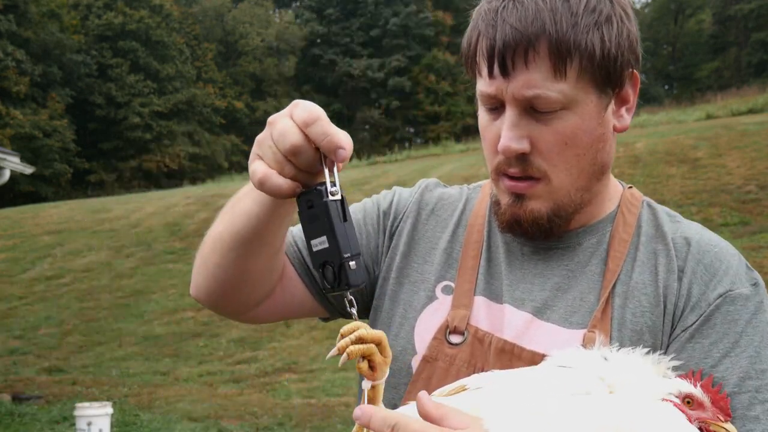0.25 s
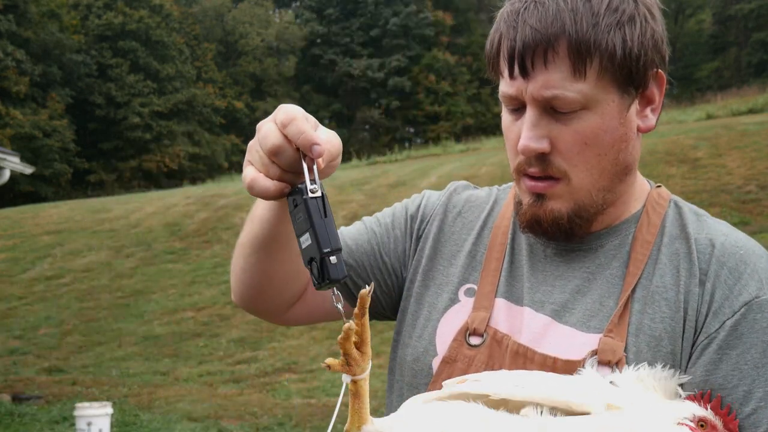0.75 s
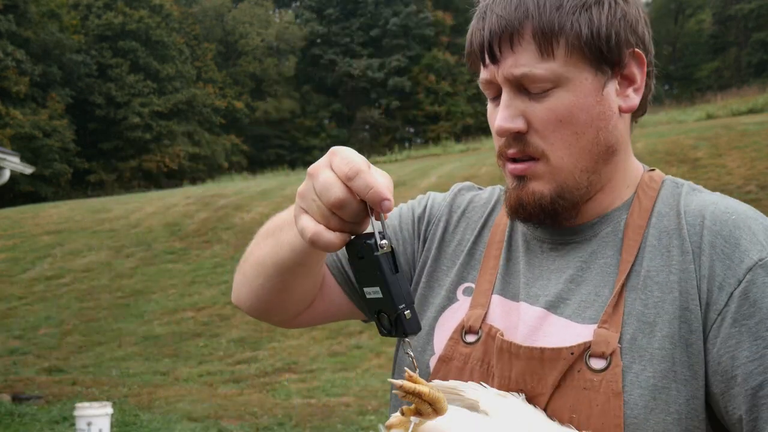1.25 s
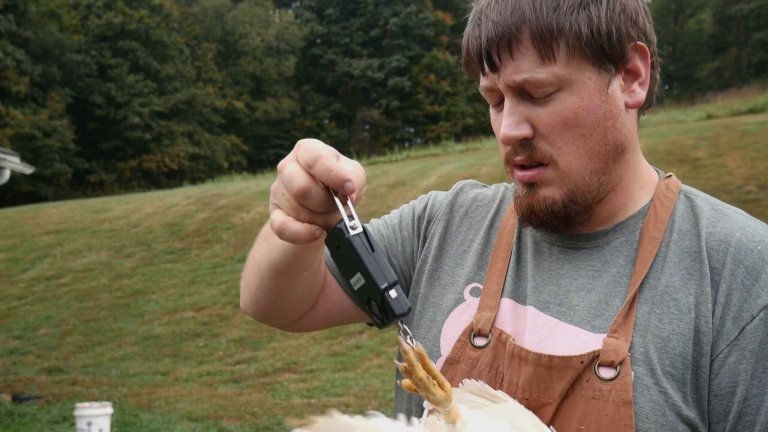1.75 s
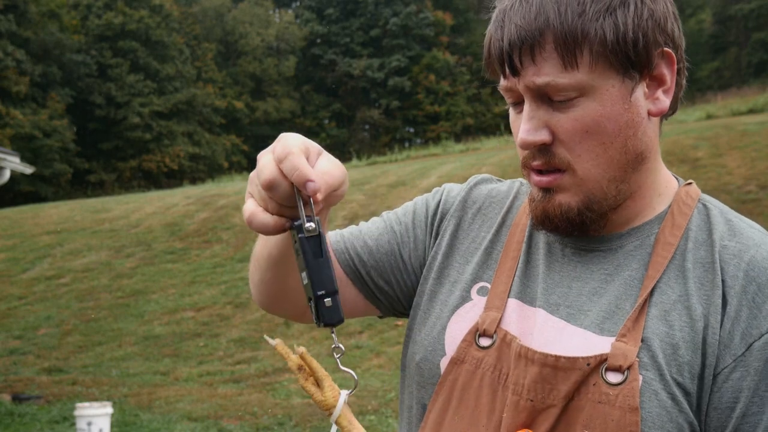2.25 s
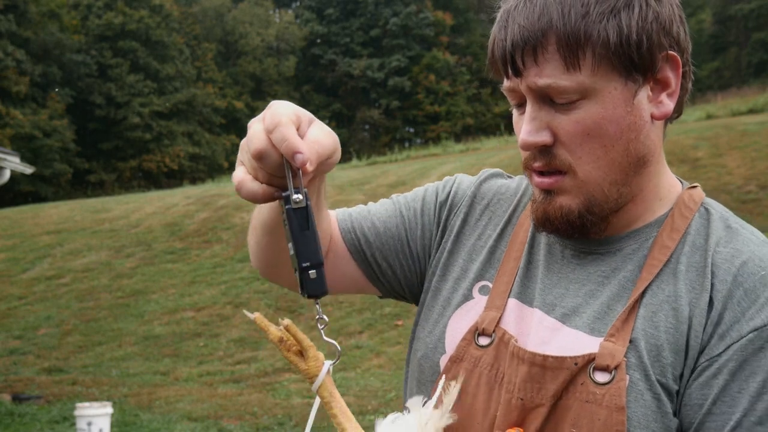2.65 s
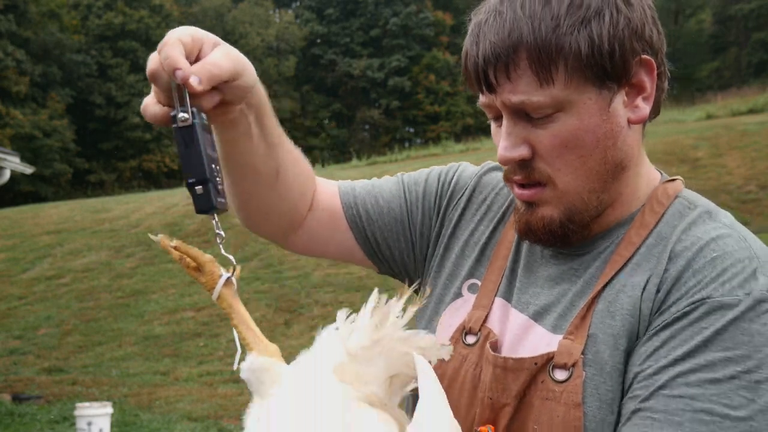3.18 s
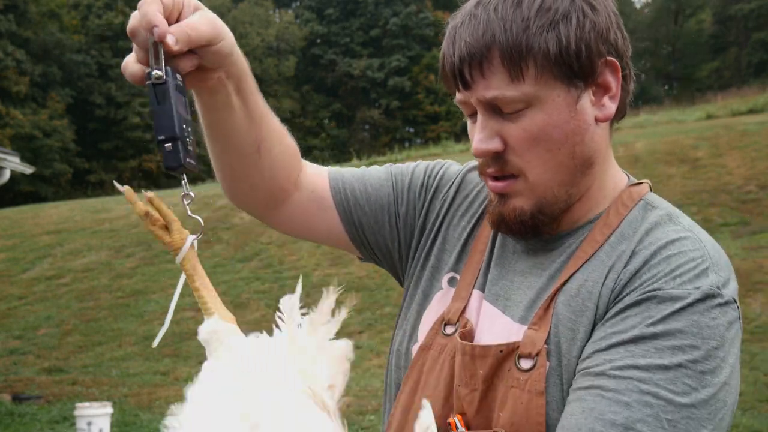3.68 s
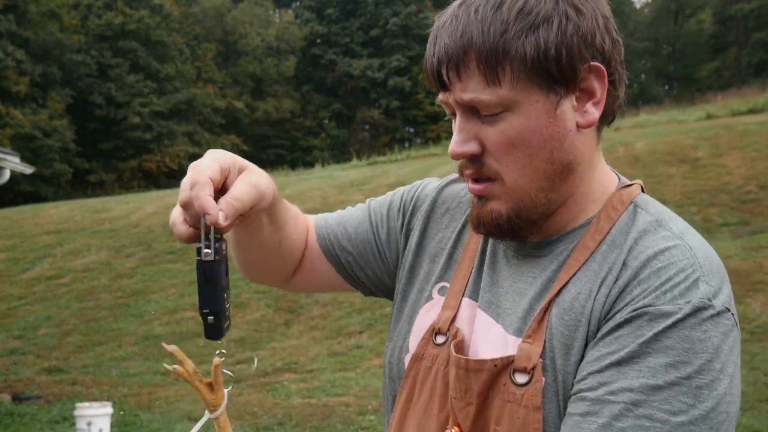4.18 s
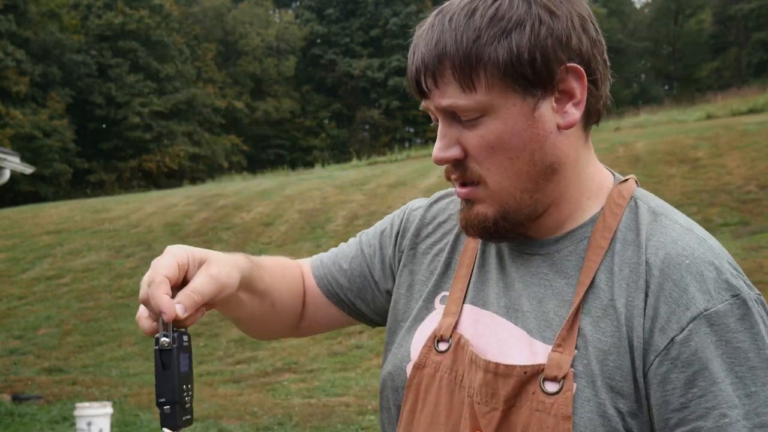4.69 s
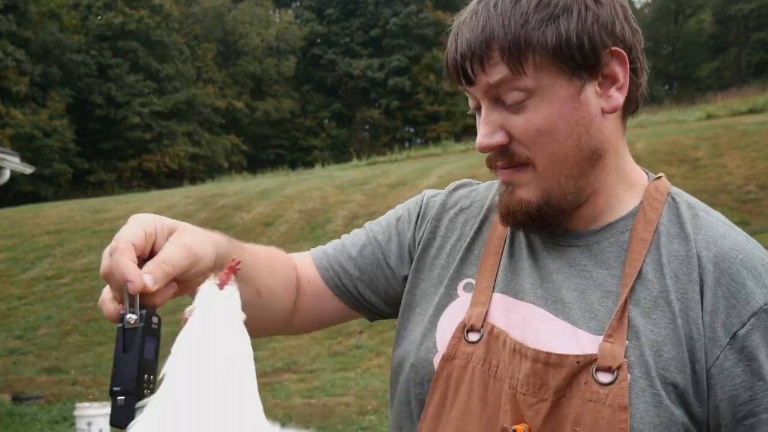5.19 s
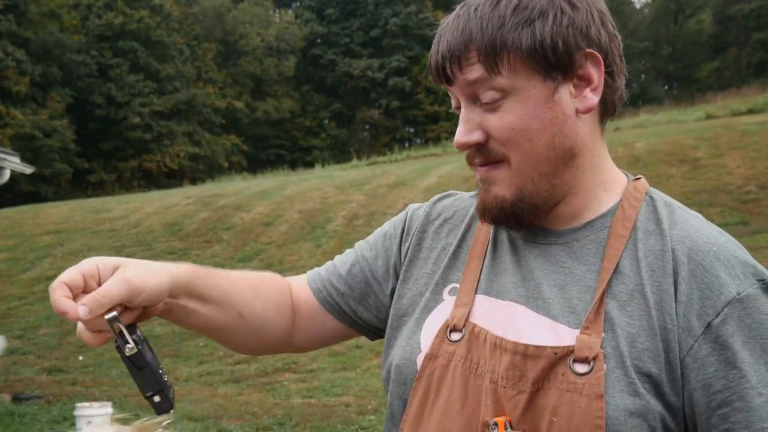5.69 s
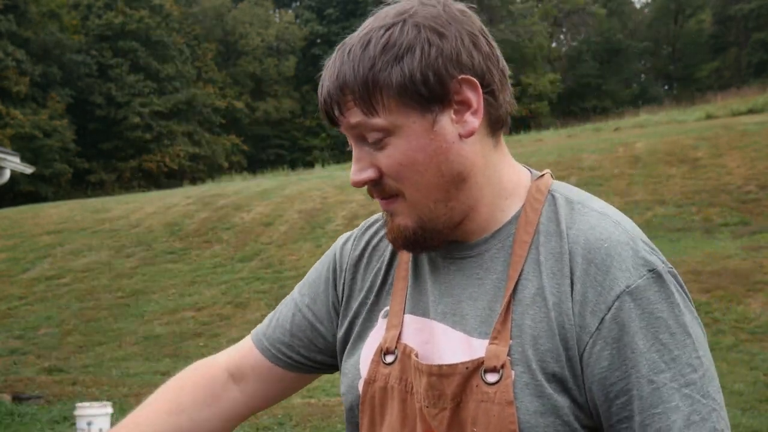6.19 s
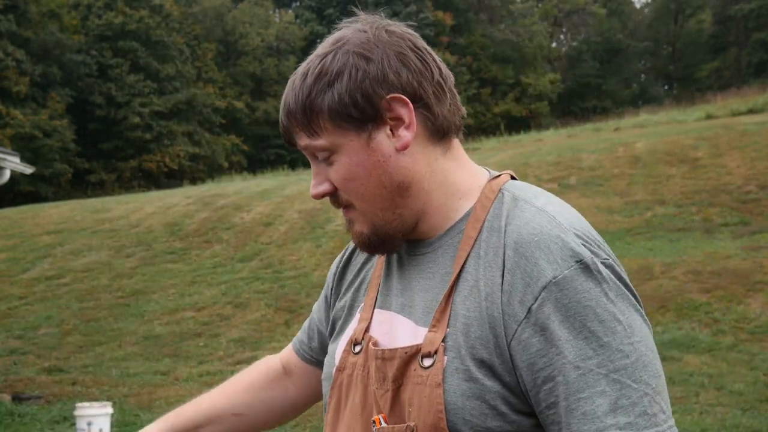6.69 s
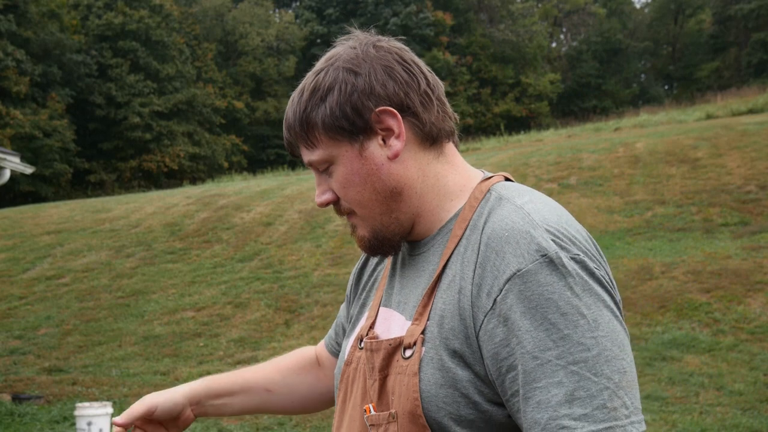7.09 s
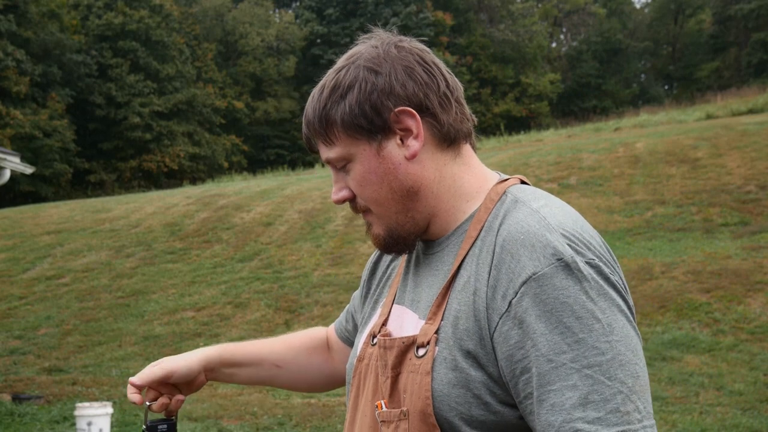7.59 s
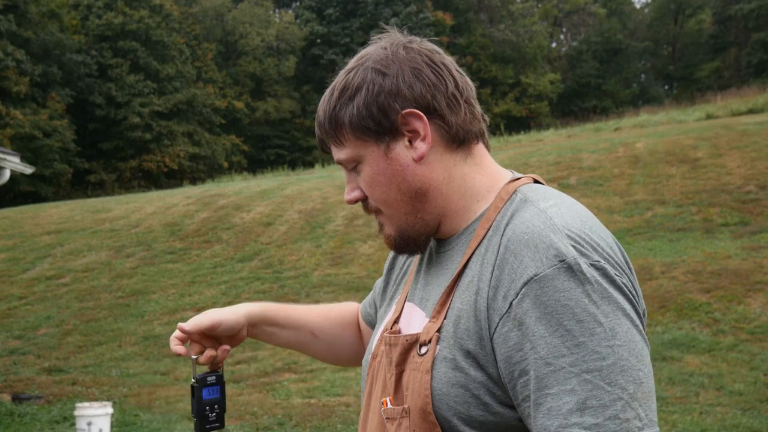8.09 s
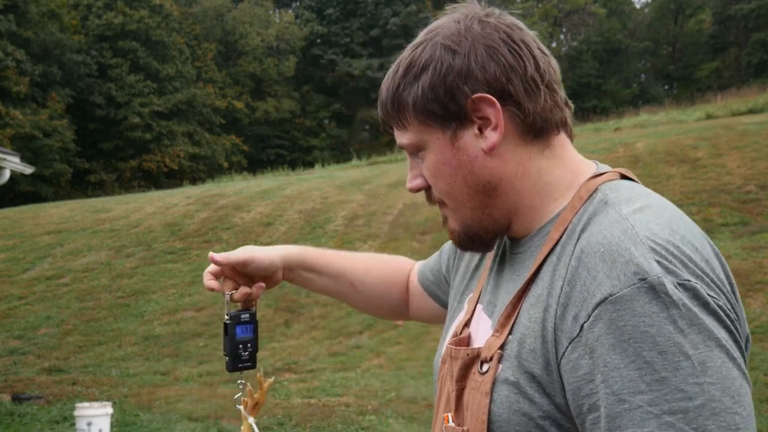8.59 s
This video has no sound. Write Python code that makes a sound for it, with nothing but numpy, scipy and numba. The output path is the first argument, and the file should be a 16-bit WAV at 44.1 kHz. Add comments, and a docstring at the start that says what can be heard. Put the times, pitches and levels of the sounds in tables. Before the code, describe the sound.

A quiet open field with soft air and a constant thin, high insect ringing. From 0 to 0.95 s two low, hoarse, breathy rasps growl close by. Short harsh hen squawks follow at 1.2, 1.6, 1.8 and 2.25 s, with rustling feathers and sharp dry snaps; the last slides down in pitch. A lull with light rustling lasts until a thin breath whistle at 3.3 s. A long loud squawk runs 3.5 to 4.2 s, rasping, then clear and wavering, with a swish and crack at 3.67. More cries come at 4.4, 5.0, 5.2 and 5.7 s amid violent wing flapping, deep gusty thumps and crackling snaps, heaviest from 5 to 5.8. Rough squawks at 6.2 and 7.0 s swell and drop at the end. Rustling fades by 8 s; tiny ticks at 7.7 and 8.2, then insects alone. Close, dry microphone, slightly overloaded when loud.

```python
"""A hen held by the legs squawks and beats her wings outdoors on a grassy slope.
Insects sing in the grass throughout, as ringing noise bands; two low hoarse rasps of noise open the scene.
Then come her squawks: syrinx pulses ring through throat and beak, flipping from harsh rasp to clear harmonics.
Noise feathers rustle and snap, wing gusts thump on the microphone, and a few late snaps follow the last cry.
The recorder's gain control ducks under the loud passages and creeps back."""
import sys
import numpy as np
from scipy import signal
from scipy.fft import rfft, irfft, next_fast_len
from scipy.io import wavfile
from scipy.ndimage import uniform_filter1d
from numba import njit

SR = 44100
rng = np.random.default_rng(int(sys.argv[2]) if len(sys.argv) > 2 else 0)


def linear_from_db(decibels):
    """Turn decibels (scalar or array-like) into linear amplitude factors; 0 gives 1."""
    return 10 ** (np.asarray(decibels, float) / 20)


def persist_wave(psi):
    """Save psi, clipped to +-1, as 16-bit WAV."""
    counts = np.round(np.clip(psi, -1, 1) * 32767).astype(np.int16)
    wavfile.write(sys.argv[1], SR, np.atleast_2d(counts).T)


N = 390285


def rms_one(x):
    """Scales x to an rms of 1."""
    return x / np.sqrt(np.mean(x ** 2) + 1e-20)


def evened(x, window_s):
    """Flattens the loudness of x to an rms of 1 over a sliding window."""
    return x / np.sqrt(uniform_filter1d(x ** 2, int(window_s * SR)) + 1e-12)


def in_time(rows):
    """Columns of a curve table, drawn as lines through every sample."""
    s, *columns = np.transpose(rows)
    return [np.interp(np.arange(N) / SR, s, c) for c in columns]


def sounding(start_s, end_s, fade_s):
    """1 from start to end, 0 outside, with soft edges."""
    gate = np.zeros(N)
    gate[int(start_s * SR):int(end_s * SR)] = 1
    return uniform_filter1d(gate, int(fade_s * SR) + 1)


def coloured(x, spectrum):
    """Shapes x by a spectrum of (Hz, dB) rows."""
    size = next_fast_len(N)
    hz, db = np.transpose(spectrum)
    bins_hz = np.arange(size // 2 + 1) * SR / size
    gain = linear_from_db(np.interp(np.log(bins_hz + 1), np.log(hz), db, left=-90))
    return irfft(rfft(x, size) * gain, size)[..., :N]


def drift(rate):
    """Smooth random wandering, about rate times a second, with an rms of 1."""
    r = np.exp(-2 * np.pi * rate / SR)
    noise = rng.standard_normal(N + SR)
    return rms_one(signal.lfilter([1], [1, -2 * r, r * r], noise)[SR:])   # the first second settles


def band_pass(x, low_hz, high_hz):
    """Keeps a band with gentle slopes."""
    return signal.sosfilt(signal.butter(1, [low_hz, high_hz], "band", fs=SR, output="sos"), x)


@njit
def moving_resonance(x, turn, r):
    """Two-pole resonance of top gain 1 whose centre (radians a sample) moves."""
    y = np.zeros(len(x))
    for i in range(2, len(x)):
        drive = (1 - r * r) / 2 * (x[i] - x[i - 2])
        y[i] = drive + 2 * r * np.cos(turn[i]) * y[i - 1] - r * r * y[i - 2]
    return y


def resonance(x, hz, width_hz):
    """Rings x at a fixed or moving frequency."""
    return moving_resonance(x, np.ones(N) * 2 * np.pi * hz / SR, np.exp(-np.pi * width_hz / SR))


def double_resonance(x, hz, width_hz):
    """Rings x twice in the same resonance, for steeper skirts."""
    return resonance(resonance(x, hz, width_hz), hz, width_hz)


def meadow():
    """Mid and side of the field air, a coloured noise, and of the throbbing noise bands of the insects."""
    # Colour of the open air. Each row: frequency in Hz, level in dB.
    air = [(15, -53.5), (25, -19), (76, -4.5), (1440, -13.5), (4370, -16), (7110, -6.5), (8590, -19.5),
           (14000, -14.5), (16000, -24)]
    # Insect choruses. Each row: centre in Hz, width of each ringing pass in Hz, middle level in dB,
    # throbs per second, throb depth from 0 to 1.
    choruses = [(7190, 850, -54, 26, 0.3), (5340, 140, -66.5, 7, 0.6), (11900, 2400, -68.5, 20, .1),
                (1404, 140, -67, 7.1, 0.5)]
    out = linear_from_db(-51) * rms_one(coloured(rng.standard_normal((2, N)), air))
    for hz, width_hz, db, per_s, depth in choruses:
        throb = 1 + depth * np.sin(2 * np.pi * per_s * np.arange(N) / SR + 1.8 * drift(4.2))
        song = np.array([rms_one(double_resonance(n, hz, width_hz)) for n in rng.standard_normal((2, N))])
        out = out + linear_from_db(db + 1.7 * drift(28.0)) * throb * song
    return out * linear_from_db([[0], [-12.0]])


def slope(x):
    """Mid and side of the returns: quick scatter from people and ground, a faint long one from the tree line."""
    t = np.arange(SR) / SR
    tail = linear_from_db(-47.5 - 60 * t / 0.073) + linear_from_db(-90.5 - 60 * t / 14.4)   # times are for a fall of 60 dB
    scatter = rng.standard_normal((2, SR)) * tail * (t > .004)
    answer = signal.lfilter([.5], [1, -.7], scatter)   # duller than the direct sound
    return signal.fftconvolve(x[None], answer, axes=1)[:, :N] * linear_from_db([[0], [-14.0]])


def hoarse_rasp():
    """Uneven breath noise rings through the resonances of a low tract; each rasp grows towards its end."""
    # Low rasps. Each row: start in seconds, end in seconds, level at the start in dB.
    rasps = [(0.0, 0.464, -43.5), (.488, 0.95, -44.5)]
    # Tract resonances. Each row: centre in Hz, width of each ringing pass in Hz, level in dB.
    tract_rows = [(420, 220, -0.5), (620, 63, -2), (770, 180, 4.5), (1186, 150, -9.5), (1400, 180, -4.5)]
    rise_db = 2.5
    source = linear_from_db(0.56 * drift(120.0)) * rng.standard_normal(N)
    tract = np.zeros(N)
    for k, (hz, width_hz, db) in enumerate(tract_rows):
        tract += (-1) ** k * linear_from_db(db) * rms_one(double_resonance(source, hz, width_hz))
    level, t = np.zeros(N), np.arange(N) / SR
    for start, end, db in rasps:
        progress = np.clip((t - start) / (end - start), 0, 1)
        level += sounding(start, end, 0.028) * linear_from_db(db + rise_db * progress)
    return rms_one(tract) * level


def wings():
    """Feathers rub in clumped grains and push soft puffs of air; each stroke adds a swish, a puff and a deep
    thump, and one bright hiss late in a cry has the same shape."""
    # Colour of rubbing feathers. Each row: frequency in Hz, level in dB.
    rustle_colour = [(180, -41), (300, -1.5), (1040, -5), (1430, -1), (1640, -9.5), (3950, -13.5),
                     (4440, -15.5), (9880, -18), (16000, -19)]
    # Colour of pushed air. Each row: frequency in Hz, level in dB.
    gust_colour = [(50, -15), (90, -10), (130, -5.5), (250, -3.5), (360, -11), (520, -15.5), (900, -60)]
    # How hard she struggles. Each row: time in seconds, rustle level in dB.
    struggle_rows = [(1.0, -61), (1.15, -48.5), (1.55, -40), (1.95, -45.5), (2.4, -40.5), (2.55, -75),
                     (2.9, -54.5), (3.4, -38), (3.6, -38), (4.2, -45), (4.29, -51), (4.33, -26.5),
                     (5.8, -34), (6.0, -32), (6.7, -41), (7.05, -34), (7.45, -41.5), (7.8, -60), (8.0, -73)]
    # Wing strokes, and at 6.56 s one bright hiss late in a cry. Each row: middle in seconds, puff level in dB,
    # swish level in dB.
    strokes_and_hiss = [(1.7, -36, -37.5), (1.77, -36, -43), (2.22, -65, -47), (3.38, -66, -75), (3.67, -33, -18.5),
                        (3.93, -32.5, -22.5), (4.48, -28, -34), (4.55, -37, -76), (4.63, -32, -55), (4.76, -49, -47),
                        (4.98, -22, -30), (5.13, -20.5, -19), (5.25, -16.5, -12.5), (5.375, -18, -13),
                        (5.5, -24, -24), (5.627, -16, -21), (5.739, -22, -12), (5.89, -31.5, -33),
                        (6.32, -33.5, -61), (6.56, -58, -29), (7.03, -34.5, -52), (7.25, -39, -59)]
    stir_db = -8   # air stirred by the struggle, above the rustle
    stroke_s, thump_s = 0.024, 0.019   # decay time either side of the middle; spread of the bell-shaped thump
    thump_db, thump_growth = -21, 1.21   # the thump equals the puff at this level and grows faster

    struggle, t = linear_from_db(in_time(struggle_rows)[0]), np.arange(N) / SR
    swish, push, thump = np.zeros((3, N))
    for s, puff_db, swish_db in strokes_and_hiss:
        near = slice(int((s - .15) * SR), int((s + .15) * SR))
        beat = np.exp(-np.abs(t[near] - s) / stroke_s)
        swish[near] += linear_from_db(swish_db) * beat
        push[near] += linear_from_db(puff_db) * beat
        bell = np.exp(-((t[near] - s) / thump_s) ** 2)
        thump[near] += linear_from_db(thump_db + thump_growth * (puff_db - thump_db)) * bell
    grains = linear_from_db(2.2 * drift(40.0) + 2.0 * drift(500.0)) * rng.standard_normal(N)
    lumps = linear_from_db(4.3 * drift(26.0)) * rng.standard_normal(N)
    rustle = (struggle + swish) * rms_one(coloured(grains, rustle_colour))
    puff = (linear_from_db(stir_db) * struggle + push) * rms_one(coloured(lumps, gust_colour))
    deep = band_pass(rng.standard_normal(N), 25.0, 110.0)
    return rustle + puff + thump * evened(deep, 0.26)


def snaps():
    """Quills and hook snap: a sharp tick, a burst of crackle that dies in a few ms, and a dull knock."""
    # Snaps. Each row: start in seconds, strength in dB, knock above that strength in dB.
    snap_rows = [(1.393, -18, -22.5), (1.606, -21.5, -21), (1.8376, -6, -8), (1.928, -10.5, -19),
                 (2.0023, -20, -20.5), (2.1044, -16.5, -19), (2.2194, -32, 12.5), (3.3, -46, -3),
                 (3.3775, -40, 9), (3.4361, -18.5, -18), (3.6668, 0.5, -17), (4.34, -15, 5),
                 (4.4455, -15, -9), (4.473, -5, 6.5), (4.52, -17, 23.5), (4.6294, -8, -5),
                 (4.749, -16, -15), (4.9095, -17, -14), (4.972, -8, -14), (5.1227, -7.5, 5),
                 (5.1646, -3, 11), (5.1798, -9, 11), (5.2397, 0.5, 11), (5.4826, -9.5, -7),
                 (5.5656, -27, -26), (5.5942, -7, 14.5), (5.607, -3, -4), (5.729, -8, -8), (5.7782, -3, 10),
                 (5.911, -10.5, -14), (5.9314, -9, -12), (6.241, -13, -15), (6.868, -33, 16.5),
                 (7.0099, -7.5, -2), (7.684, -35.5, 5), (7.7076, -21.5, -3.5), (8.2343, -22.5, 7.5),
                 (8.2483, -32, 8)]
    out, t = np.zeros(N), np.arange(1200) / SR
    noise = rng.standard_normal((len(snap_rows), 1200))
    crackles = band_pass(noise, 2500.0, 10000.0)
    knocks = band_pass(noise, 250.0, 1400.0)
    tick_and_burst = 1.66 * np.exp(-t / 0.00027) + 0.33 * np.exp(-t / 0.0062)
    for (s, snap_db, knock_db), crackle, knock in zip(snap_rows, crackles, knocks):
        snap = crackle * tick_and_burst + linear_from_db(knock_db) * knock * np.exp(-t / 0.007)
        out[int(s * SR):int(s * SR) + 1200] += linear_from_db(snap_db) * snap
    return out


def whine():
    """Air whistles narrowly in the windpipe before the voice sets in."""
    # Thin whistles of breath. Each row: start in seconds, end in seconds, level in dB.
    whistles = [(1.073, 1.213, -56), (3.3, 3.475, -46)]
    air = double_resonance(rng.standard_normal(N), 1434.0, 50.0)
    return rms_one(air) * sum(linear_from_db(db) * sounding(start, end, .04) for start, end, db in whistles)


def breath_of_squawks():
    """Level, dB under full, fundamental dB and treble dB: each cry has an attack, a swell, a hold and a release."""
    # Squawks. Each row: start in seconds, end of breath in seconds, full level in dB, swell time in seconds,
    # fundamental above the overtones in dB once it has set in, before the breath fails or the pitch sinks.
    squawks = np.array([(1.222, 1.55, -17, 0.045, -7.5), (1.581, 1.677, -16, 0.015, -3),
                        (1.813, 1.892, -12, 0.0087, -12), (2.254, 2.475, -12.5, 0.0048, -9),
                        (3.467, 4.22, -7, .02, -13), (4.418, 4.826, -7, 0.084, -14.5),
                        (4.962, 5.06, -0.5, .03, -15), (5.215, 5.444, -4.5, 0.038, -12.5),
                        (5.672, 5.845, -13, .01, -15.5), (6.214, 6.509, -6.5, 0.18, -12),
                        (6.514, 6.587, -4.5, 0.0031, -26.5), (7.032, 7.489, -7, .17, -10)])
    attack_s, swell_db, release_db_per_s = 0.0083, 13.5, 580
    low_sets_in_s, low_late_db = 0.025, 18   # the fundamental joins after the rasp has begun
    treble_full_db, treble_fade_db_per_s = 5, 496.5   # treble dies first once the breath ends

    t = np.arange(N) / SR
    current = np.clip(np.searchsorted(squawks[:, 0], t) - 1, 0, None)
    start, end, full_db, swell_s, low_db = squawks[current].T
    age, over = np.clip(t - start, 0, None), np.clip(t - end, 0, None)
    under_db = swell_db * np.exp(-age / swell_s) + release_db_per_s * over
    low_db = low_db - low_late_db * np.exp(-age / low_sets_in_s)
    treble_db = treble_full_db - np.minimum(treble_fade_db_per_s * over, 30.0)
    level = np.clip(age / attack_s, 0, 1) * linear_from_db(full_db - under_db)
    return level, under_db, low_db, treble_db


def hen():
    """Syrinx pulses, shaken in timing and strength by the roughness, ring through throat and beak."""
    # Pitch, one list a squawk. Each row: time in seconds, pitch in Hz before warble and shake,
    # beak resonance in Hz before it darkens, closes or shakes.
    pitch_rows = [
        [(1.2, 550, 1420), (1.32, 519.3, 1250), (1.42, 548, 1300), (1.56, 525.2, 1200)],
        [(1.6, 484, 1330), (1.65, 530, 1400), (1.71, 477.6, 1280)],
        [(1.82, 547.4, 1420), (1.87, 537, 1340), (1.92, 476, 1209)],
        [(2.26, 620, 1580), (2.32, 655, 1620), (2.38, 631, 1455), (2.433, 510, 1250), (2.47, 419, 984),
         (2.51, 414.7, 900)],
        [(3.45, 420, 1453), (3.62, 451.5, 1566), (3.68, 502.2, 1640), (3.8, 522, 1625), (3.938, 585.4, 2400),
         (3.99, 592.4, 2300), (4.1, 581, 1610), (4.14, 596.8, 1620), (4.2, 611, 1220), (4.23, 449, 1210),
         (4.27, 420, 1203)],
        [(4.42, 592, 1400), (4.64, 587.8, 1798), (4.68, 552, 1674), (4.72, 572.6, 1720), (4.765, 579.4, 1790),
         (4.79, 491.3, 1460), (4.84, 447, 1060)],
        [(4.96, 446.6, 1447), (5.03, 540, 1600), (5.043, 575, 1500), (5.07, 429.8, 1208)],
        [(5.22, 593, 1490), (5.35, 609, 1560), (5.375, 548, 1580), (5.41, 539, 1499), (5.425, 570, 1157),
         (5.455, 523, 1079)],
        [(5.68, 664, 1469), (5.88, 645, 1162)],
        [(6.22, 620, 1359), (6.33, 644.6, 1811), (6.437, 512, 1677), (6.47, 580, 1492), (6.53, 498, 1500),
         (6.61, 393.4, 1400)],
        [(7.04, 581.4, 1290), (7.24, 626, 1902), (7.3, 562, 1990), (7.34, 557, 1781), (7.37, 574, 1700),
         (7.423, 537.4, 1628), (7.446, 588, 1500), (7.5, 555, 1277), (7.55, 446.7, 1180)],
    ]
    # Stretches where the membranes lock to a steadier beat; elsewhere roughness is 1.
    # Each row: start in seconds, end in seconds, roughness from 0 to 1 before smoothing and drift.
    locked = [(1.615, 1.7, .3), (1.855, 1.92, .2), (2.27, 2.385, .55), (2.385, 2.46, .3), (2.46, 2.56, .1),
              (3.61, 3.635, .3), (3.665, 3.69, .15), (3.71, 3.795, .04), (3.85, 3.99, .04),
              (4.035, 4.115, .02), (4.115, 4.21, .08), (4.21, 4.28, .15), (4.652, 4.76, .08),
              (4.785, 4.86, .45), (4.99, 5.01, .4), (5.01, 5.04, .1), (5.04, 5.09, .4), (5.368, 5.42, .08),
              (5.42, 5.47, .3), (6.33, 6.425, .55), (6.425, 6.45, .15), (6.45, 6.515, .6),
              (6.515, 6.62, .5), (7.3, 7.383, .03), (7.383, 7.395, .4), (7.395, 7.45, .07),
              (7.45, 7.5, .25)]
    # Colour of the throat. Each row: frequency in Hz, level in dB.
    throat_colour = [(410, 3), (700, 8), (880, 4), (1310, 4), (1750, -5), (2600, -2), (3200, -8.5),
                     (3900, -12.5), (4350, -24), (4750, -21.5), (5200, -17.5), (5900, -17), (6500, -22.5),
                     (7000, -23), (14000, -32.5)]
    # Warble of one stretch: start in seconds, end in seconds, swings per second, share of the pitch.
    warble_from, warble_to, warble_per_s, warble_share = (4.11, 4.21, 33.0, 0.022)
    rasp_treble_db = 3   # treble lift that full roughness adds

    pitch_hz, beak_hz = in_time(sum(pitch_rows, []))
    level, under_db, low_db, treble_db = breath_of_squawks()
    swing = np.sin(2 * np.pi * warble_per_s * (np.arange(N) / SR - warble_from - .022))
    pitch_hz = pitch_hz * (1 + warble_share * sounding(warble_from, warble_to, 0.018) * swing)

    # as breath fails the voice darkens and thins to its second partial
    slack = np.clip(under_db - 4.5, 0, 25)
    low_db = low_db - 0.18 * slack
    treble_db = treble_db - 0.33 * slack
    beak_hz = beak_hz * linear_from_db(-.1 * slack)
    # at the low end of a fall the beak closes onto the second partial
    sunk = np.clip((500.0 - pitch_hz) / 60.0, 0, 1)
    low_db = low_db - 6.6 * sunk
    treble_db = treble_db - 1.7 * sunk
    beak_hz = beak_hz + 0.21 * sunk * (2 * pitch_hz - beak_hz)

    rough = np.ones(N)
    for start, end, share in locked:
        rough[int(start * SR):int(end * SR)] = share
    # the rasp half locks now and then
    rough = uniform_filter1d(rough, 200) * np.clip(1 + .25 * drift(13.0), .3, 1.3)

    shaken_hz = pitch_hz * (1 + .07 * rough * drift(50.0))
    cycles = np.cumsum(shaken_hz) / SR + 0.091 * rough * drift(339.0)
    rough_db = rough * (1.9 * np.tanh(drift(200.0)) + 2.4 * np.tanh(drift(30.0)))
    strength = linear_from_db(rough_db + 1.46 * drift(31.0))
    partials = np.zeros(N)
    for k in range(2, 24):
        partials += linear_from_db(4.65 * drift(9.8)) * np.cos(2 * np.pi * k * cycles)   # each swells on its own
    turbulence = (.04 + 2.4 * rough ** 3.5) * rng.standard_normal(N)   # air in the gap
    throat = coloured(strength * (partials + turbulence), throat_colour)

    beak = resonance(throat, beak_hz * (1 + 0.12 * rough * drift(26.0)), 252.0)
    gullet_hz = 2031.0 * (1 + 0.079 * (0.61 + 0.59 * rough) * drift(5.5))   # a second, restless cavity
    gullet = resonance(throat, gullet_hz, 93.0)
    windpipe = resonance(throat, 1440.0, 73.0)
    voice = throat + linear_from_db(14.0) * beak - linear_from_db(15.5) * gullet + linear_from_db(12.0) * windpipe
    treble = signal.sosfilt(signal.butter(2, 2100.0, "high", fs=SR, output="sos"), voice)
    overtones = evened(voice + (linear_from_db(treble_db + rasp_treble_db * rough) - 1) * treble, 0.02)

    low_cycles = cycles + 0.066 * rough ** 2 * drift(60.0)
    low_tone = resonance(strength * np.cos(2 * np.pi * low_cycles), pitch_hz, 290.0)
    flutter = linear_from_db(6.6 * rough * np.tanh(drift(40.0)))
    fundamental = flutter * evened(low_tone, 0.28)
    return level * (overtones + linear_from_db(low_db) * fundamental)


def gain_control(x):
    """Turns down a share of what exceeds the threshold, quickly, and comes back at a steady rate."""
    threshold_db, share, back_db_per_s, attack_s = -17.0, 0.86, 3.5, 0.005
    level_db = 10 * np.log10(uniform_filter1d(np.mean(x ** 2, axis=0), int(0.05 * SR)) + 1e-12)
    wanted_db = share * np.clip(level_db - threshold_db, 0, None)
    back_db = back_db_per_s * np.arange(N) / SR
    cut_db = np.maximum.accumulate(wanted_db + back_db) - back_db   # holds the deepest cut, less the recovery
    r = np.exp(-1 / (attack_s * SR))
    return x * linear_from_db(-signal.lfilter([1 - r], [1, -r], cut_db))


def scene():
    """Near sources sit near the middle; close microphones hear mainly their treble a little differently."""
    near = hen() + whine() + wings() + snaps() + hoarse_rasp()
    mid, side = meadow() + slope(near)
    side = side + 0.081 * drift(16.0) * np.gradient(np.gradient(near))   # treble that differs left to right
    side = side + 0.0067 * drift(8.0) * near   # sources moving a little off the axis
    return np.array([near + mid + side, near + mid - side])


def band_limit(x):
    """A steep low-pass at the top of the band."""
    return signal.sosfilt(signal.butter(12, 16800, fs=SR, output="sos"), x)


def record(dry):
    """Gain control rides the level, then peaks are rounded and the top is cut steeply."""
    rounded = 1.007 * np.tanh(gain_control(dry) / .95)
    top_cut = signal.cheby2(10, 60, 16500, fs=SR, output="sos")   # 60 dB down from 16500 Hz
    mix = signal.sosfilt(top_cut, rounded)
    return band_limit(mix)


dry = scene()
out = record(dry)
persist_wave(out)
```